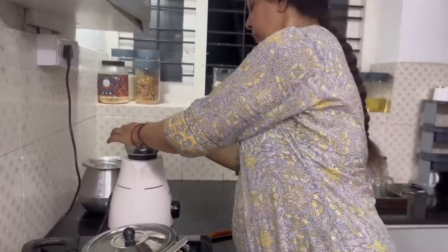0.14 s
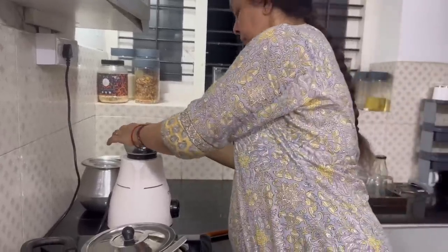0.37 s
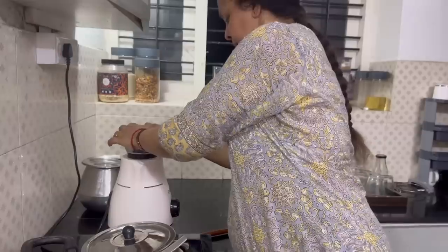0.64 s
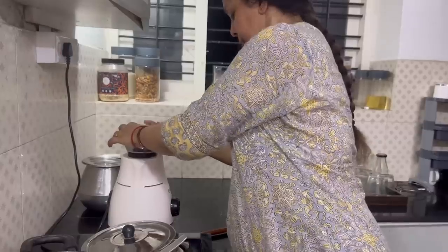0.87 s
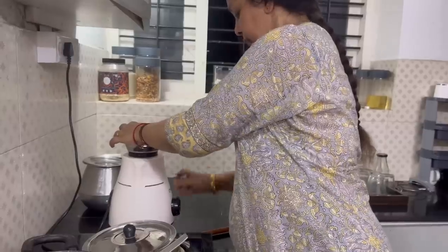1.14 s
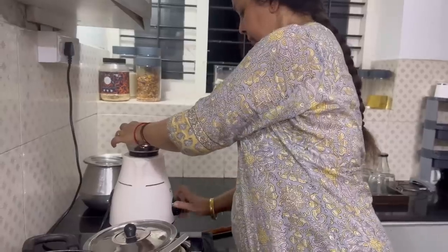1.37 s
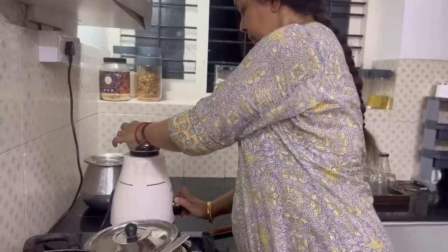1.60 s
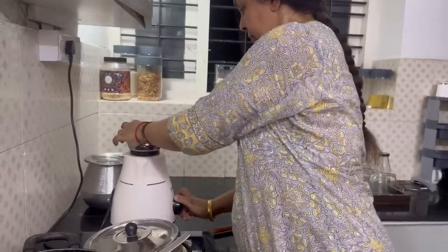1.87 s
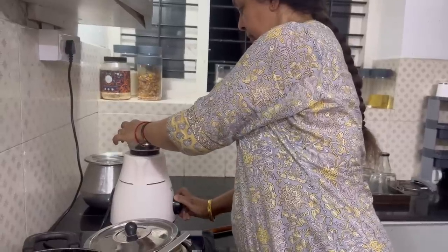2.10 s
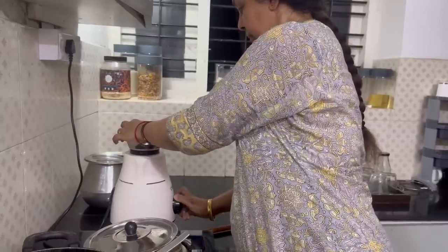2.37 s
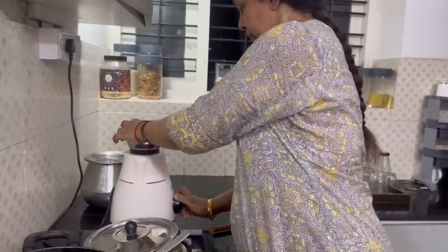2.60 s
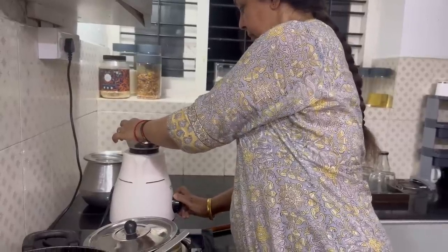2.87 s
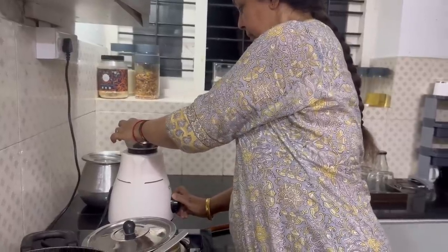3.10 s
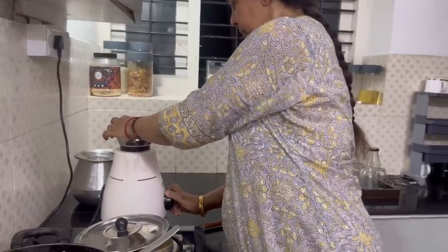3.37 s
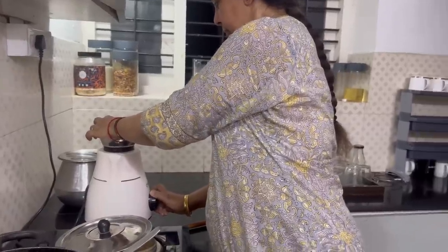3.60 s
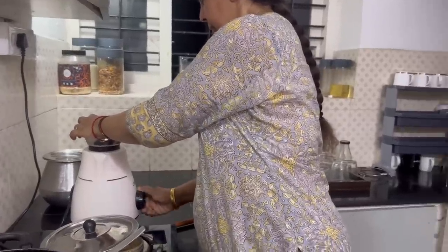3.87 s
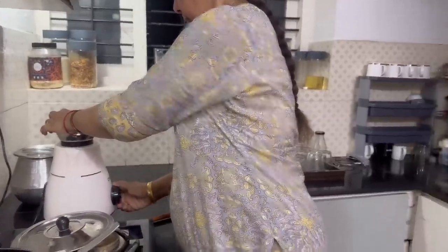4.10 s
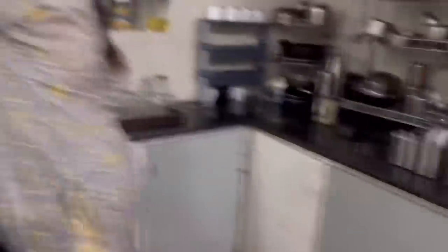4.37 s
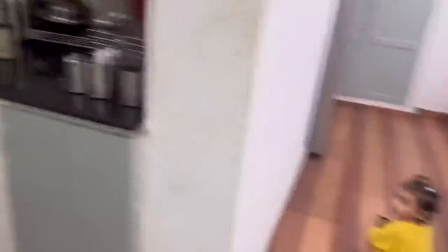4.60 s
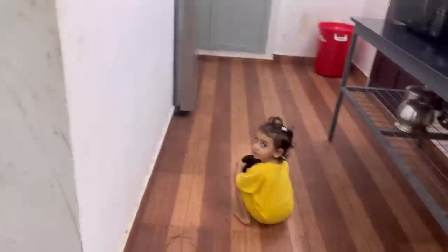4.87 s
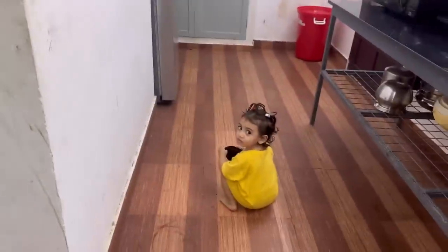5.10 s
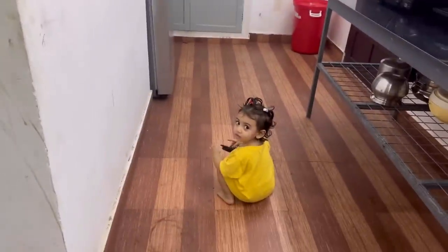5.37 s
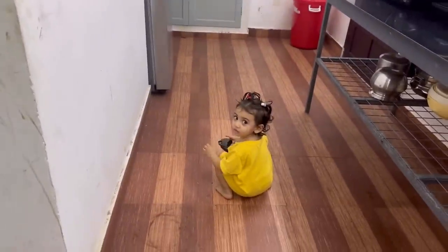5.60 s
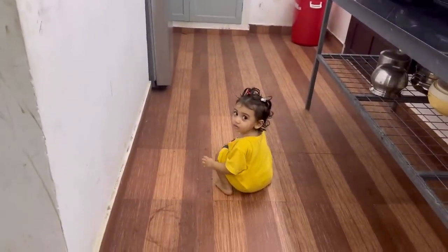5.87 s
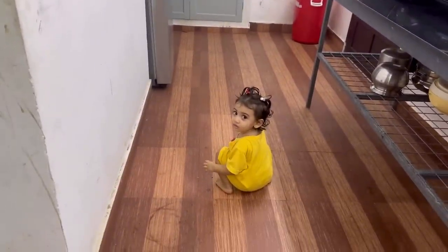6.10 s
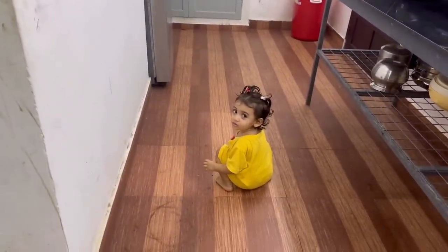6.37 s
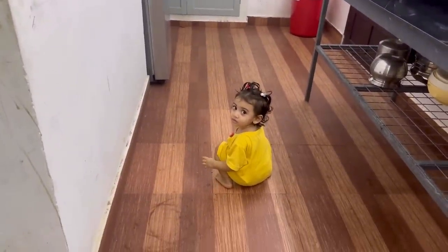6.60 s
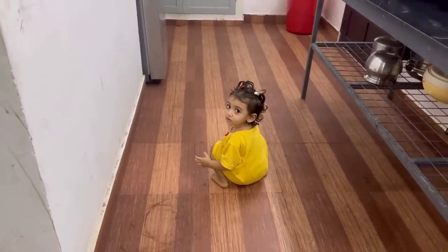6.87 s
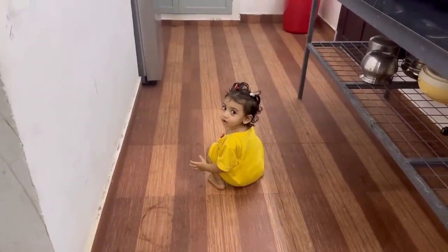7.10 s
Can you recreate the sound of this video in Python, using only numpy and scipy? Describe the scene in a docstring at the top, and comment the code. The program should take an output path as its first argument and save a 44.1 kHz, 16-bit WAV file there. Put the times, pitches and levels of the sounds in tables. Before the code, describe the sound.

Handheld phone close to a kitchen counter: near-quiet room tone and hand rumble, a short rubbery squeak of the jar twisting, soft knocks and a sharp plastic click. Then a thumping motor start, buzzing hum and fast rising whine settle into a harsh, steady grinder roar. Turning the phone away softens it, the hard walls reflecting the continuing motor.

```python
"""Kitchen, stone counter: a mixer grinder. Its jar is twisted on (rubbing noise), bracelets clink, knocks and a
knob tick sound (dying sines, tinted bursts), then the motor kicks and spins up: a whine of shaft orders
(sines on one speed curve), mains hum and a roar of cooling air (shaped noise), over room tone and hand rumble.
The phone then turns away and the sound gets duller. Left and right differ in phase and level by frequency."""
import sys
import numpy as np
from scipy import signal
from scipy.fft import rfft, irfft, next_fast_len
from scipy.io import wavfile
from scipy.ndimage import uniform_filter1d

SR = 44100
rng = np.random.default_rng(int(sys.argv[2]) if len(sys.argv) > 2 else 0)


def persist_wave(psi):
    """Save psi, clipped to +-1, as 16-bit WAV."""
    counts = np.round(np.clip(psi, -1, 1) * 32767).astype(np.int16)
    wavfile.write(sys.argv[1], SR, np.atleast_2d(counts).T)


def field_ratio(decibels):
    """Amplitude ratio for a level in dB (20 dB per decade); scalars and array-likes work."""
    return 10 ** (np.asarray(decibels, dtype=float) / 20)


N = 318843

# Phone turning: t/s, share turned away
TURN = [(0, 0), (4.0, 0), (4.7, 0.85), (7.3, 1)]

# Room tone with the low modes of the kitchen: f/Hz, relative level/dB
ROOM_COLOUR = [(25, -36), (60, -11), (92, 0), (112, -8), (135, -2), (152, -10), (170, -8), (195, -16),
               (230, -4), (255, -19), (400, -22), (900, -27), (2000, -37), (2800, -38), (4000, -45),
               (8000, -49), (11000, -55), (15800, -62)]
# Rumble of the holding hand: f/Hz, relative level/dB
HAND_COLOUR = [(20, -22), (45, -5), (70, -4), (110, -10), (200, -30), (400, -54), (2000, -110)]
# Wavering low hum of an appliance: f/Hz, mean level facing/dB
LOW_HUM = (99.5, -56)
# Grip shifts: t/s, level/dB
BUMPS = [(0.0, -64), (2.03, -58), (4.57, -48), (6.191, -49)]
ROOM_FACING_DB, BUMP_T60_S = -51.5, 0.34
# mean hand rumble with the motor running, depth of its sway, extra before the motor starts
HAND_DB, HAND_SWAY_DB, GRIP_DB = -66, 4.0, 3.0

# Jar twisted onto its seat: t/s, rub level/dB, brightness 0-1
TWIST = [(0.0, -60, 0), (0.07, -56, 0), (0.12, -68, 0), (0.45, -72, 0.2), (0.71, -64, 0.1), (0.75, -56, 0),
         (0.805, -45.5, 0), (0.86, -47.5, 0.25), (0.92, -49, 0.65), (0.956, -51, 0.9), (0.99, -55, 0.75),
         (1.04, -56, 0.7), (1.08, -63, 0.7), (1.16, -68, 0.5)]
# Rub colour: f/Hz, relative level dull/dB, relative level bright/dB
JAR_COLOUR = [(300, -18, -22), (480, -10, -17), (640, -12, -17), (730, 6, -4), (860, -2, 2),
              (1000, -18, -13), (1200, -22, 1), (1300, -28, -13), (1450, -30, -9), (2000, -36, -19),
              (3200, -42, -25), (4100, -44, -22), (6000, -52, -35), (10000, -62, -48)]

# Bracelet clinks: t/s, level/dB
CLINKS = [(.665, -72), (1.04, -59.5), (1.3, -73)]
# Bracelet modes: f/Hz, relative level/dB, t60/s
BRACELET_MODES = [(6500, -1, .09), (6050, -6, .08), (9030, 1, 0.15), (10190, -5, 0.13), (12450, -3, .11),
                  (13100, -8, .08)]
# Soft knocks: t/s, level/dB, f/Hz
KNOCKS = [(0.947, -28.5, 373), (0.965, -38, 350), (1.148, -38.5, 413), (1.389, -47, 1050),
          (1.446, -41, 302), (1.653, -36, 1040), (1.656, -39, 340)]
# Knob ticks: t/s, level/dB, t60/s, lowpass corner/Hz (capped at SR/3)
TICKS = [(1.3876, -53, 0.054, 6000), (1.395, -61, 0.32, 3500), (1.6534, -26.5, 0.074, 15000),
         (1.696, -22, 0.064, 15000)]
# Colour of a plastic tick: f/Hz, relative level/dB
TICK_COLOUR = [(700, -8), (1500, -10), (2800, 1.5), (4500, -5), (6000, 0), (8000, 5), (11500, -7),
               (13000, -10), (15800, -2)]
# Torque blows at start-up: t/s, level/dB
KICKS = [(1.6971, -9.5), (1.706, -14), (1.7173, -13), (1.727, -17.5), (1.739, -27)]
# Modes rung by the blows: f/Hz, relative level/dB, t60/s
KICK_MODES = [(407, -12.5, 0.29), (607, -7, 0.092), (833, 3.5, 0.02), (953, 4, 0.02), (1270, -14, 0.017),
              (1400, -8.5, 0.027)]
KNOCK_T60_S = 0.022

# Rotor passes, two a turn: t/s, f/Hz
PASS_RATE = [(1.72, 235.9), (1.76, 288.5), (1.82, 361.5), (1.87, 415.6), (1.93, 462), (2.0, 495),
             (2.1, 532), (2.25, 572.5), (2.45, 594.2), (2.75, 610.2), (3.2, 617.3), (3.58, 608.4),
             (3.7, 610), (3.93, 604), (4.04, 611.6), (4.4, 624.1), (5.08, 638.7), (5.16, 628.4),
             (5.55, 649.5), (5.7, 655), (6.0, 660.4), (6.2, 660.4), (6.52, 659), (6.6, 654), (7.23, 652.3)]
# Air noise: t/s, housing roar level/dB, air hiss level/dB
ROAR = [(1.7, -26, -32), (1.76, -26, -35), (1.85, -24.5, -28), (1.93, -22, -23.5), (2.2, -21, -20),
        (2.7, -22.5, -21.5), (3.02, -24, -23), (3.61, -25.5, -24), (4.35, -29.5, -27), (4.55, -32, -30),
        (5.3, -33.5, -30.5), (5.9, -32, -30.5), (6.3, -32, -29), (7.23, -32.5, -30)]
# Air noise colour: f/Hz, relative level facing/dB, relative level turned away/dB
AIR_COLOUR = [(40.4, -59, -68), (139, -12.5, -11.5), (286, -7, 0), (338, 2, 6), (418, -9, -5),
              (805, -9.5, -4), (815, -9, -3.5), (1503, -9.5, -7.5), (1528, -16, -14), (2810, -9, -13),
              (5720, -15.5, -19), (8920, -10.5, -11.5), (11120, -24.5, -26), (15400, -23, -27.5)]
# Housing resonances in the air noise: f/Hz, width/Hz, relative level/dB
HOUSING = [(225.3, 5.2, 6.5), (273, 23, 1), (354.5, 18, -1.5), (403.5, 12.2, 5), (800.3, 11, 6.5),
           (836, 23, -3.5), (872, 8.5, 1.5), (1411, 39, -3.5), (3453, 37, -5)]
# Loudest orders: multiples of the pass rate
STRONG = (2, 4, 5, 6, 7, 8, 10, 11, 12, 14)
# Their whines: t/s, then one level/dB per multiple, in the order of STRONG
WHINE = [(1.74, -42, -50, -53, -48, -43, -38, -43, -46, -52, -63),
         (1.81, -37, -55, -46, -41, -48, -45, -47, -42, -42, -47),
         (1.88, -38, -55, -36, -30, -34, -31, -51, -49, -31, -56),
         (1.94, -40, -48, -42, -35, -41, -39, -47, -48, -32, -55),
         (1.99, -39, -40, -32, -28, -29, -38, -53, -40, -38, -40),
         (2.08, -35, -33, -35, -40, -55, -37, -43, -37, -31, -43),
         (2.16, -25, -42, -27, -29, -37, -52, -37, -46, -43, -31),
         (2.25, -29, -32, -31, -22.5, -34, -34, -45, -34, -28, -37),
         (2.35, -34.5, -45, -25.5, -23.5, -38, -40, -46, -36, -26, -35),
         (2.45, -30, -46, -23.5, -33, -29, -31, -36, -38, -27.5, -31),
         (2.58, -28.5, -28.5, -29.5, -24, -35, -34, -46, -34, -28, -37),
         (2.72, -32, -29.5, -29, -21.5, -28.5, -44, -46, -35, -33, -32),
         (2.95, -51, -27.5, -29, -21, -36, -35, -40, -27, -31, -41),
         (3.2, -35, -32.5, -39, -24.5, -36, -40, -44, -29, -30, -40),
         (3.42, -37, -33.5, -32, -23, -35, -41, -40, -30.5, -34, -40),
         (3.65, -31, -29, -36, -22.5, -36, -43, -37, -35.5, -35, -38),
         (3.78, -34, -35, -36, -25, -45, -47, -46, -36, -39, -44),
         (3.92, -29, -42, -36, -40, -43, -47, -46, -44, -27.5, -47),
         (4.0, -41.5, -32.5, -30.5, -21.5, -36.5, -49, -43, -39, -37, -43),
         (4.2, -42, -36.5, -42, -23, -35, -40, -44, -32, -36, -38),
         (4.35, -40.5, -29.5, -41, -30, -54, -43, -41, -30.5, -31.5, -35),
         (4.6, -46, -40, -53, -36, -48, -46, -49, -39.5, -41, -44),
         (4.8, -50, -36, -45, -32, -55, -42, -38, -33, -34, -36),
         (5.08, -51, -37.5, -40, -36.5, -43, -47, -43, -44, -33, -46),
         (5.4, -41, -43, -50, -38, -46, -53, -46, -38, -34, -35),
         (5.62, -43.5, -40.5, -41, -41, -53, -42, -44, -39, -41, -36),
         (5.85, -63, -31, -47, -46, -43, -42, -45, -39, -45, -38),
         (6.1, -60, -47, -42, -36.5, -43, -56, -44, -41, -41, -45),
         (6.3, -57, -40, -45, -36, -47, -41, -42, -39, -39, -40),
         (6.48, -43.5, -42, -34.5, -43, -41, -37, -42, -40, -43, -56),
         (6.65, -47, -39, -49, -37.5, -42, -52, -37.5, -38, -43, -33),
         (6.9, -45, -33, -50, -34.5, -57, -41, -37, -38, -49, -37.5),
         (7.15, -43.5, -37.5, -58, -51, -38, -39, -55, -39, -47, -41)]
# Weaker orders: multiple of the pass rate, peak re air hiss facing/dB, same turned away/dB (at REF_HZ)
WEAK_ORDERS = [(.5, -10, -9.5), (1, -15.5, -15), (1.5, -14, -21), (2.5, -16, -24.5), (3, -16.5, -13.5),
               (4.5, -21, -19), (5.5, -28, -24), (6.5, -22.5, -12.5), (8.5, -33, -43), (9, -11.5, -15),
               (13, -21, -27), (15, -13.5, -13.5), (16, -13, -23), (17, -19, -25), (18, -17, -22),
               (19, -22, -36)]
# Magnetic hum: f/Hz, level at full speed facing/dB, extra at switch-on/dB, fade of the extra/s
MAINS = [(100.3, -48.5, 14.5, 0.77), (189.6, -55.5, 30.5, 0.44), (397, -45.5, 27, 0.32)]
START_S, ON_S, FIELD_HZ = ROAR[0][0], KICKS[0][0], MAINS[0][0]
GROWTH, REF_HZ = 2.7, 620  # weaker orders rise as this power of pass rate / REF_HZ
WET_DB, WALLS_T60_S = -11.5, 0.5  # the walls break up a gliding tone
PEAK_LOSS_AWAY = 0.48  # share of the housing peaks lost when turned away
# shaking at spin-up breaks up the whines (depth) and smears them (rad per multiple)
SHAKE_DEPTH, SHAKE_FADE_S, SHAKE_HZ, SHAKE_RAD = 2.0, 0.3, 45, 0.09
BLUR_RAD = 0.03  # speed jitter on the weaker orders, rad per multiple
FLUTTER, FLUTTER_AWAY, FLUTTER_HZ = 0.2, 0.14, 42  # depth facing, extra depth turned away, rate
# sharp casing mode: rung by the shaking, and added gain on tones that cross it
CASING_HZ, CASING_WIDTH_HZ, CASING_RING_DB, CASING_GAIN = 3406, 24, -37, 0.8

# Stereo likeness, nearly full in much of the treble (over 1 is clipped): f/Hz, facing, turned away
LIKENESS = [(60, 0.97, 0.93), (360, 0.935, 0.68), (590, 0.77, 0.22), (1100, 0.81, 0.38), (1700, 0.98, 0.84),
            (2530, 1.025, 1.01), (3320, 0.88, 0.86), (4500, 0.96, 0.96), (13200, 1.05, 1.05),
            (13800, 0.44, 0.53)]
# Stereo phase by frequency: f/Hz, left lead/rad
LEFT_LEAD = [(60, 0), (430, .2), (1000, .5), (1460, 0), (2700, 0), (3500, .6), (4500, 0), (6700, 0),
             (7400, 1.4), (7720, 3.2), (8750, 3.2), (9100, 1.8), (10000, .9), (10450, 0), (13500, 0),
             (14000, -1), (14700, -1.5), (15800, -2.8)]
# Stereo level by frequency: f/Hz, left minus right/dB
LEFT_DB = [(60, 0), (160, 4), (300, 1), (740, 3), (1220, 0.5)]
EDGE_HZ = 15800


def evened(x):
    """Scales to rms 1."""
    return x / np.sqrt(np.mean(x ** 2) + 1e-20)


def read(points, hz, axis=1):
    """Table column against log frequency."""
    table = np.transpose(points)
    return np.interp(np.log(hz + 1), np.log(table[0] + 1), table[axis])


def curve(rows, t, axis=1):
    """Table column against time."""
    table = np.transpose(rows)
    return np.interp(t, table[0], table[axis])


def add(mix, s, sound):
    """Adds a sound into the mix at s seconds."""
    part = mix[round(s * SR):][:len(sound)]
    part += sound[:len(part)]


def stft_grid(size=1024):
    """Frame times and bin frequencies of short-time spectra."""
    return np.arange(4 * N // size + 5) * size / 4 / SR, np.fft.rfftfreq(size, 1 / SR)


def noise(shape, size=1024):
    """Noise of bins x frames magnitude; frames levelled to unit power, whole to rms 1."""
    a, b = rng.standard_normal(shape.T.shape + (2,)).T
    unit = shape / np.sqrt((shape ** 2).sum(0))
    return evened(signal.istft((a + 1j * b) * unit, nperseg=size, noverlap=3 * size // 4)[1][:N])


def steady_noise(colour, size=1024):
    """Noise of one unchanging colour."""
    frames, hz = stft_grid(size)
    return noise(np.outer(field_ratio(read(colour, hz)), np.ones(len(frames))), size)


def waver(rate_hz):
    """Random wander: knots of rms 1 at the given rate, joined by straight lines."""
    knots = rng.standard_normal(int(N / SR * rate_hz) + 2)
    return np.interp(np.arange(N) / SR * rate_hz, np.arange(len(knots)), knots)


def fading(depth, rate_hz):
    """A steady path plus drifting reflections: swells and brief dropouts."""
    return abs(1 + depth * (waver(rate_hz) + 1j * waver(rate_hz))) / np.sqrt(1 + depth ** 2)


def ring(modes):
    """A struck thing: dying sines with a soft start."""
    t = np.arange(SR // 3) / SR
    rise = 1 - np.exp(-t / 0.0008)
    return rise * sum(field_ratio(db - 60 * t / t60) * np.sin(2 * np.pi * hz * t) for hz, db, t60 in modes)


def walls(x, t60, delay=300):
    """Tiled walls: a dense dying tail of energy 1, from delay samples on."""
    t = np.arange(int(t60 * SR)) / SR
    tail = rng.standard_normal(len(t)) * field_ratio(-60 * t / t60) * (t > delay / SR)
    return signal.oaconvolve(x, tail / np.linalg.norm(tail))[:N]


def room_tone():
    """Quiet kitchen air, a wavering low hum, and the rumble of the hand on the phone."""
    t = np.arange(N) / SR
    turned = curve(TURN, t)
    air = field_ratio(ROOM_FACING_DB - 2.0 * turned) * steady_noise(ROOM_COLOUR, size=2048)
    hum_hz, hum_db = LOW_HUM
    hum = field_ratio(hum_db + 4.0 * waver(12) - 4.0 * turned) * np.sin(2 * np.pi * hum_hz * t)
    grip = field_ratio(HAND_DB + HAND_SWAY_DB * waver(5.2) + GRIP_DB * (t < ON_S))
    for s, db in BUMPS:
        grip = grip + np.clip((t - s) / 0.026, 0, 1) * field_ratio(db - 60 * abs(t - s) / BUMP_T60_S)
    return air + grip * steady_noise(HAND_COLOUR, size=2048) + hum


def twist():
    """Rubber drags on plastic in uneven slips; its colour follows the brightness curve."""
    frames, hz = stft_grid(size=512)
    bright = np.clip(curve(TWIST, frames, axis=2), 0, 1)
    colour_db = np.outer(read(JAR_COLOUR, hz), 1 - bright) + np.outer(read(JAR_COLOUR, hz, axis=2), bright)
    rub = noise(field_ratio(colour_db), size=512)
    t = np.arange(N) / SR
    inside = np.clip(np.minimum(t - TWIST[0][0], TWIST[-1][0] - t) / 0.033, 0, 1)
    drag = inside * field_ratio(curve(TWIST, t) + 1.2 * waver(70)) * rub
    return drag + field_ratio(-6.0) * walls(drag, WALLS_T60_S)


def hits():
    """Struck modes for clinks, knocks and start-up blows; decaying noise for knob ticks; wall tail."""
    mix, t = np.zeros(N), np.arange(SR // 3) / SR
    for s, db in CLINKS:
        add(mix, s, field_ratio(db) * ring(BRACELET_MODES))
    for s, db, hz in KNOCKS:
        add(mix, s, ring([(hz, db, KNOCK_T60_S)]))
    plastic = steady_noise(TICK_COLOUR)
    for s, db, t60, corner_hz in TICKS:
        lowpass = signal.butter(1, min(corner_hz, SR / 3), fs=SR)
        burst = signal.lfilter(*lowpass, plastic[round(s * SR):][:len(t)])
        add(mix, s, field_ratio(db - 60 * t / t60) * burst)
    for s, db in KICKS:
        add(mix, s, field_ratio(db) * ring(KICK_MODES))
    return mix + field_ratio(-4.0) * walls(mix, 0.6)


def airflow(size):
    """Magnitude of the cooling air through the housing, and the power share above the crossover."""
    frames, hz = stft_grid(size)
    turned = curve(TURN, frames)
    colour_db = np.outer(read(AIR_COLOUR, hz), 1 - turned) + np.outer(read(AIR_COLOUR, hz, axis=2), turned)
    peaks = sum(2.07 * field_ratio(db) / (1 + (2 * (hz - f) / w) ** 2) for f, w, db in HOUSING)
    patches = rng.standard_normal(colour_db.T.shape)
    patches = uniform_filter1d(uniform_filter1d(patches, 10, 0), 10, 1)
    patches = evened(patches).T
    high = 1 / (1 + (1600 / (hz[:, None] + 1)) ** 8)
    return field_ratio(colour_db + 1.43 * patches) * (1 + np.outer(peaks, 1 - PEAK_LOSS_AWAY * turned)), high


def air_noise(t, passes):
    """Low roar and chopped high hiss of the cooling air."""
    shape, high = airflow(size=4096)
    roar = field_ratio(curve(ROAR, t)) * noise(shape * np.sqrt(1 - high), size=4096)
    # fan blades chop the air once and four times a turn; the flow gusts a little
    chop = 1 + 0.15 * np.cos(np.pi * passes) + 0.12 * np.cos(4 * np.pi * passes)
    gusts = field_ratio(0.7 * waver(14))
    shape, high = airflow(size=1024)
    return roar + field_ratio(curve(ROAR, t, axis=2)) * chop * gusts * noise(shape * np.sqrt(high))


def strong_orders(t, passes, away, shaking):
    """Loudest shaft orders: each flutters, and is broken up and smeared by the spin-up shaking."""
    whine = 0
    for i, k in enumerate(STRONG):
        level = np.sqrt(2) * field_ratio(curve(WHINE, t, axis=1 + i) + 1.2 * waver(24))
        level = level * fading(FLUTTER + FLUTTER_AWAY * away, FLUTTER_HZ) * fading(SHAKE_DEPTH * shaking, SHAKE_HZ)
        smear = 0.32 * waver(60) + k * SHAKE_RAD * shaking * waver(200)
        whine = whine + level * np.cos(2 * np.pi * k * passes + smear)
    return whine


def weak_orders(passes, growth, away, shaking):
    """Weaker shaft orders: grow with speed; reflections make each swell and fade on its own."""
    weak = 0
    for k, near_db, far_db in WEAK_ORDERS:
        level = field_ratio((1 - away) * near_db + away * far_db + 2.56 * waver(5)) * growth
        level = level * fading(0.37, 16) * fading(SHAKE_DEPTH * shaking, SHAKE_HZ)
        blur = k * (BLUR_RAD + SHAKE_RAD * shaking) * waver(200)
        weak = weak + level * np.cos(2 * np.pi * (k * passes + rng.random()) + blur)
    return weak


def slip_lines(t, passes, growth, away, shaking):
    """The second multiple beats with the mains field: lines FIELD_HZ below and above it."""
    level = field_ratio(-14 - 4 * away + 3 * waver(8)) * growth * fading(0.62, 30)
    below = np.cos(2 * np.pi * (2 * passes - FIELD_HZ * t))
    above = np.cos(2 * np.pi * (2 * passes + FIELD_HZ * t))
    return level * (below + (0.3 + 3.2 * shaking) * above)


def mains_hum(t, away):
    """Magnetic hum; the inrush current dies as speed builds."""
    since = np.maximum(t - START_S, 0)
    hum = 0
    for f, db, extra_db, fade in MAINS:
        level_db = db + extra_db * np.exp(-since / fade) - 10.0 * away + 3.0 * waver(18)
        hum = hum + field_ratio(level_db) * np.sin(2 * np.pi * f * t)
    return hum


def motor():
    """Shaft orders, mains hum and air noise, with a ringing casing mode and wall tail on the tones."""
    t = np.arange(N) / SR
    rate = uniform_filter1d(curve(PASS_RATE, t), size=1500)
    passes = np.cumsum(rate) / SR
    away, growth = curve(TURN, t), (rate / REF_HZ) ** GROWTH
    shaking = np.exp(-np.maximum(t - START_S, 0) / SHAKE_FADE_S)
    on = np.clip((t - ON_S) / 0.014, 0, 1)
    whine = strong_orders(t, passes, away, shaking)
    weak = weak_orders(passes, growth, away, shaking) + slip_lines(t, passes, growth, away, shaking)
    ripple = 1 + 0.07 * np.cos(2 * np.pi * FIELD_HZ * t)  # torque ripple: side lines around each order
    tones = on * ripple * (whine + field_ratio(curve(ROAR, t, axis=2)) * weak)
    mode = signal.iirpeak(CASING_HZ, CASING_HZ / CASING_WIDTH_HZ, fs=SR)
    rattle = evened(signal.lfilter(*mode, rng.standard_normal(N))) * np.sqrt(shaking) * field_ratio(CASING_RING_DB)
    tones = tones + CASING_GAIN * signal.lfilter(*mode, tones) + on * rattle
    return on * (air_noise(t, passes) + mains_hum(t, away)) + tones + field_ratio(WET_DB) * walls(tones, WALLS_T60_S)


def scene():
    """Left and right share one part of the sound; the rest wanders in phase between them."""
    mono = room_tone() + twist() + hits() + motor()
    hz, t, z = signal.stft(mono, SR, nperseg=1024, noverlap=768)
    turned = curve(TURN, t)
    same = np.outer(read(LIKENESS, hz), 1 - turned) + np.outer(read(LIKENESS, hz, axis=2), turned)
    half = np.arccos(np.clip(same, 0, 1)) / 2
    a, b = rng.standard_normal(z.T.shape + (2,)).T
    drift = uniform_filter1d(uniform_filter1d(a, size=6, axis=1), size=3, axis=0)
    drift = drift + 1j * uniform_filter1d(uniform_filter1d(b, size=6, axis=1), size=3, axis=0)
    mid = z * np.cos(half)
    side = 1.41 * z * np.sin(half) * drift / abs(drift)
    return signal.istft(np.array([mid + side, mid - side]), SR, nperseg=1024, noverlap=768)[1][:, :N]


def band_limit(x):
    """A steep low-pass at the top of the band."""
    return signal.sosfilt(signal.butter(12, 16400, fs=SR, output="sos"), x)


def record(dry):
    """Stereo phase and level by frequency, and the band limits."""
    size = next_fast_len(N + 4096)
    hz = np.fft.rfftfreq(size, 1 / SR)
    left = field_ratio(read(LEFT_DB + [(2000, 0)], hz) / 2)  # half the difference to each side; level above 2 kHz
    left = left * np.exp(0.5j * np.clip(read(LEFT_LEAD, hz), -np.pi, np.pi))
    edge = 1 / (1 + (hz / EDGE_HZ) ** 200)
    edge = edge / np.sqrt(1 + (45 / (hz + 1)) ** 6)  # the microphone drops deep bass
    stereo = irfft(rfft(dry, size) * np.array([left, 1 / left]) * edge, size)[:, :N]
    return band_limit(stereo)


dry = scene()
out = record(dry)
persist_wave(out)
```